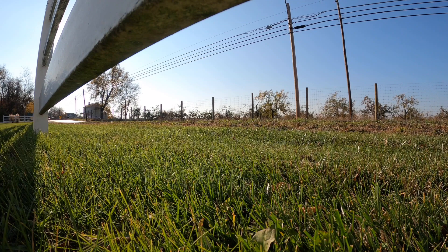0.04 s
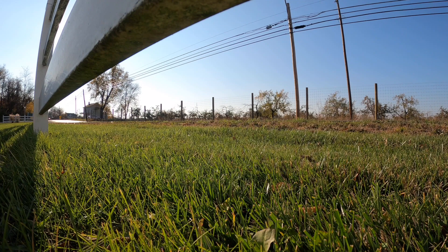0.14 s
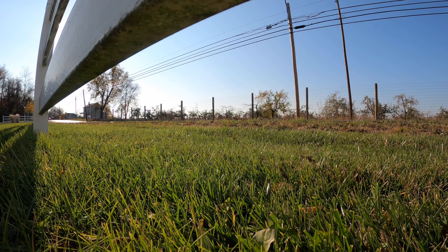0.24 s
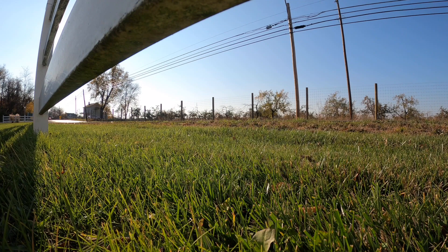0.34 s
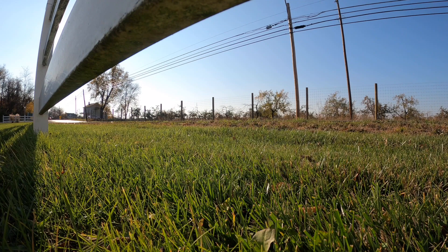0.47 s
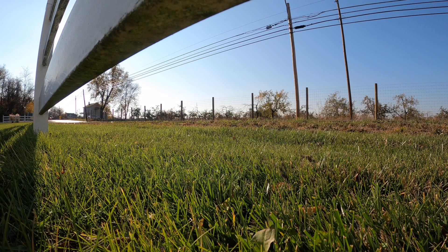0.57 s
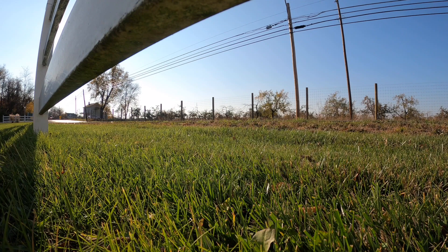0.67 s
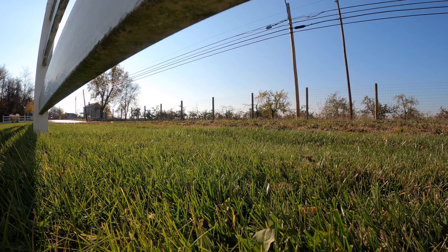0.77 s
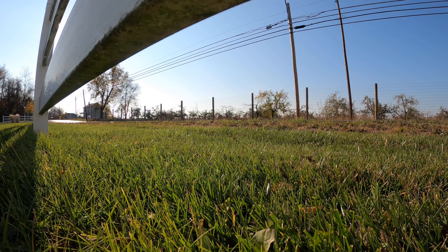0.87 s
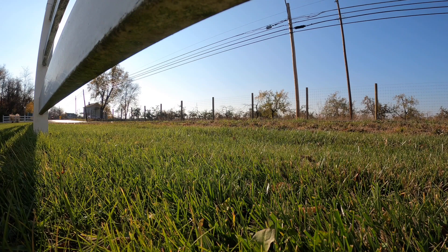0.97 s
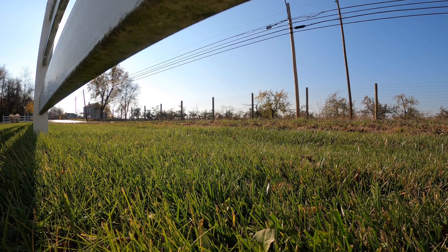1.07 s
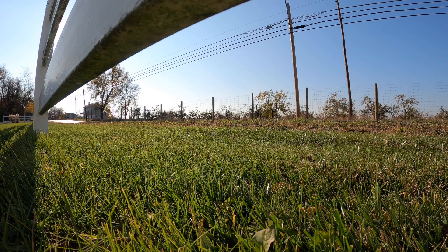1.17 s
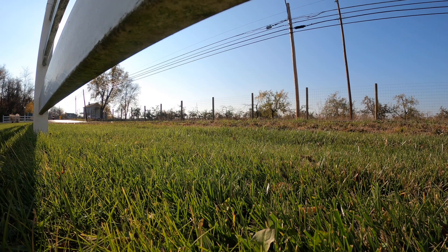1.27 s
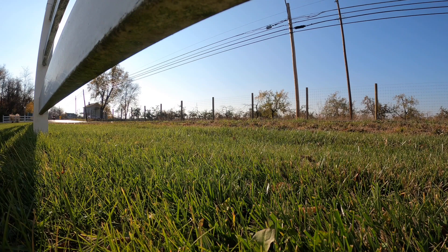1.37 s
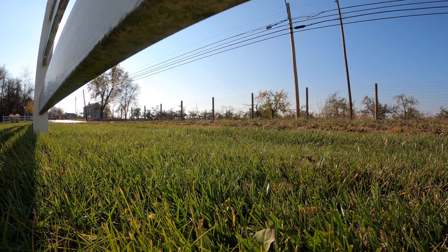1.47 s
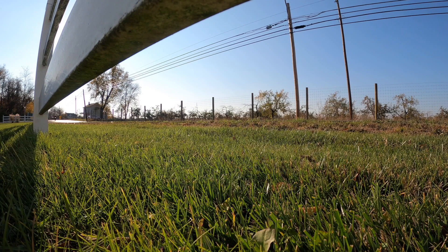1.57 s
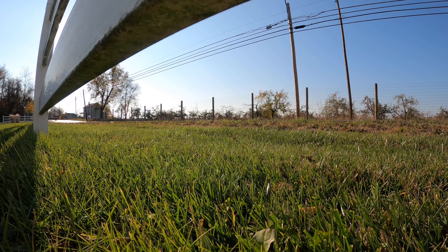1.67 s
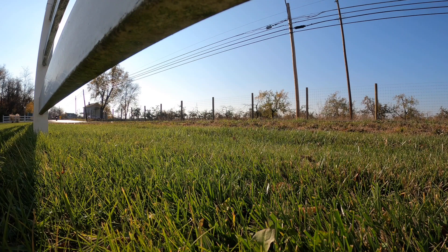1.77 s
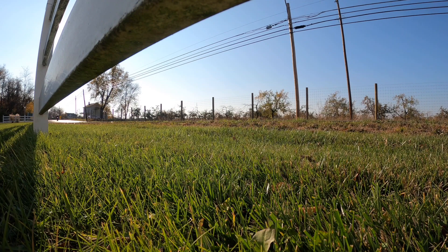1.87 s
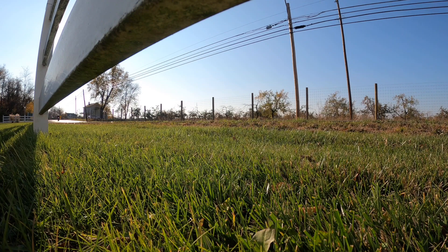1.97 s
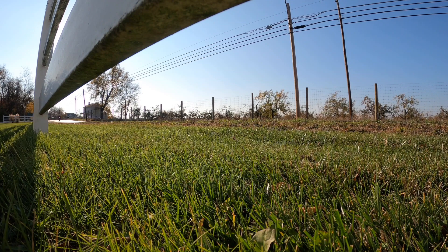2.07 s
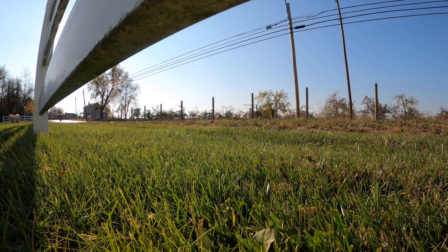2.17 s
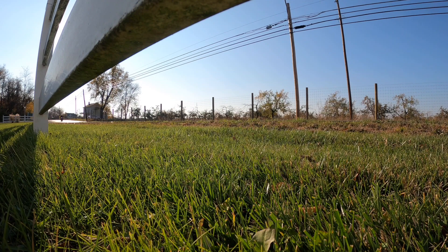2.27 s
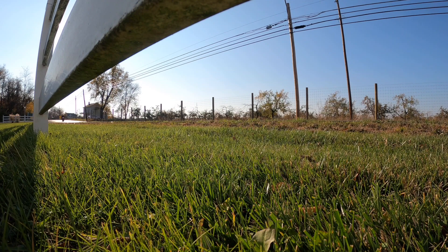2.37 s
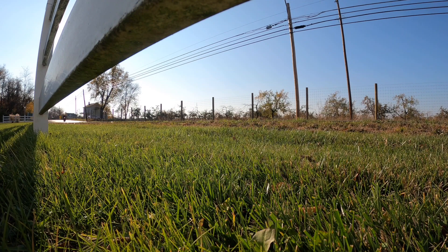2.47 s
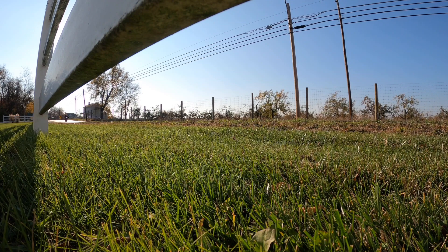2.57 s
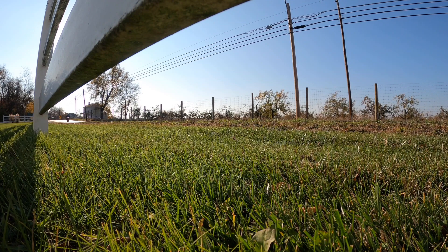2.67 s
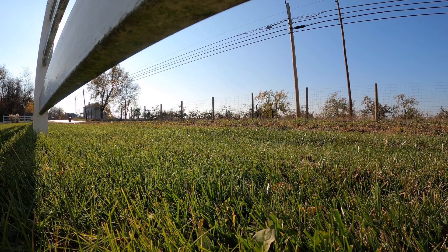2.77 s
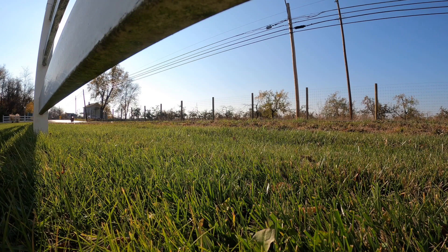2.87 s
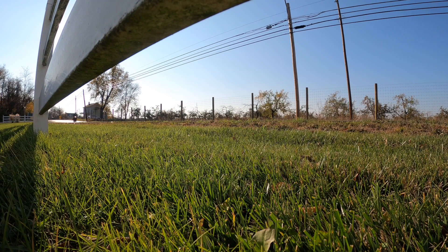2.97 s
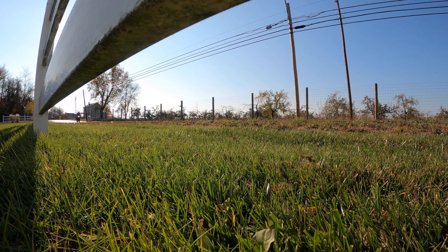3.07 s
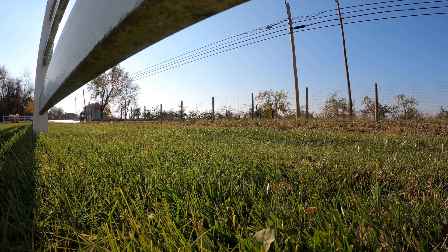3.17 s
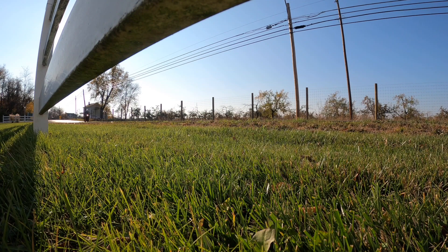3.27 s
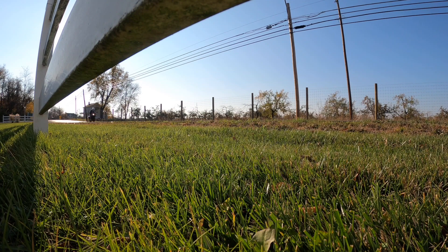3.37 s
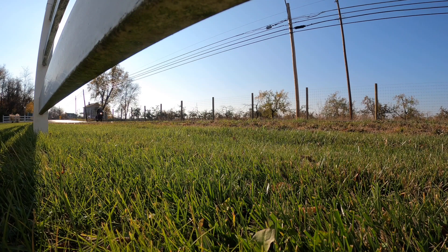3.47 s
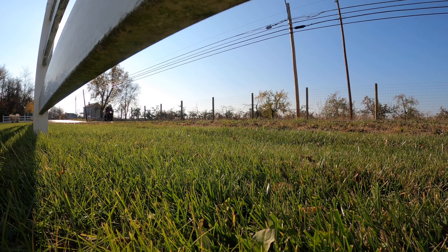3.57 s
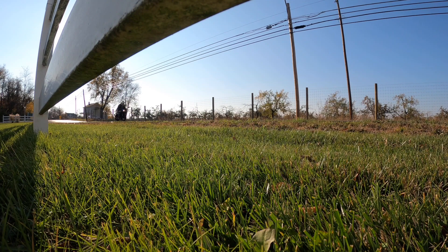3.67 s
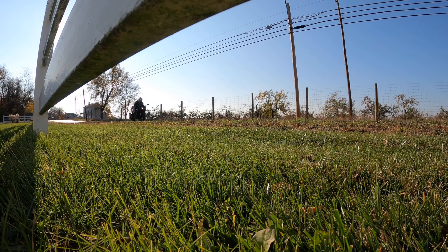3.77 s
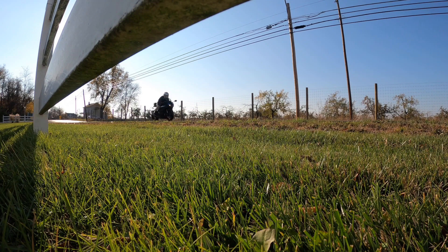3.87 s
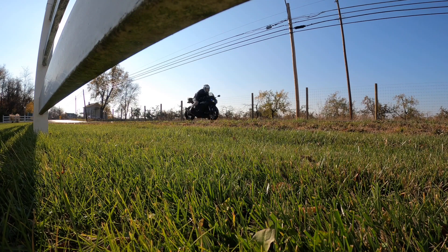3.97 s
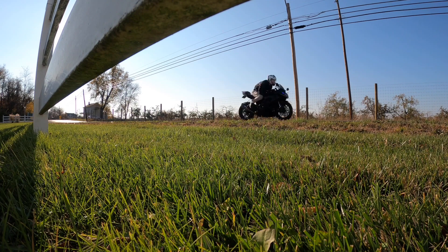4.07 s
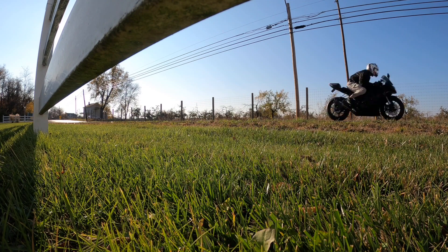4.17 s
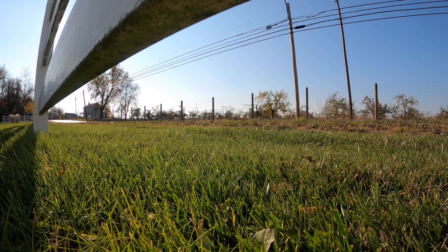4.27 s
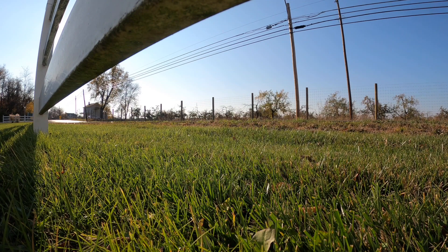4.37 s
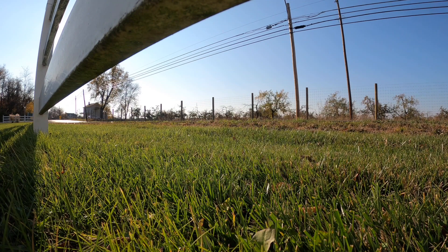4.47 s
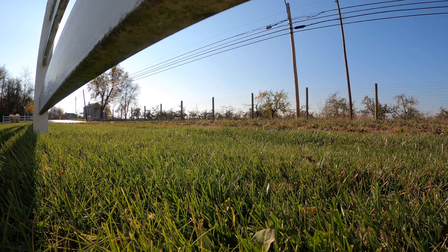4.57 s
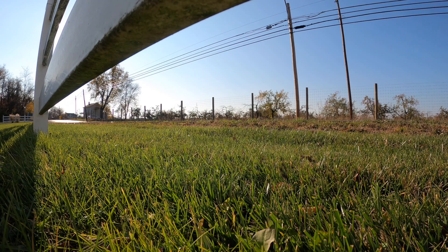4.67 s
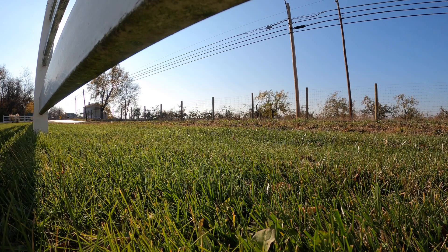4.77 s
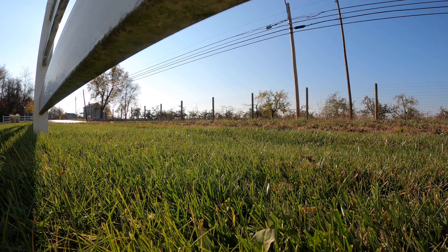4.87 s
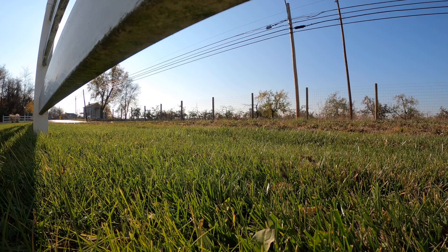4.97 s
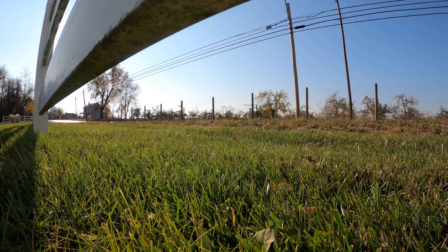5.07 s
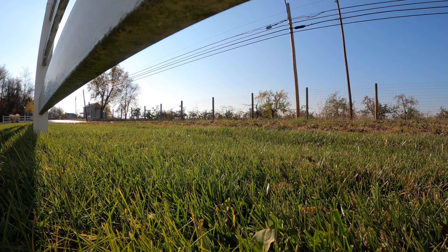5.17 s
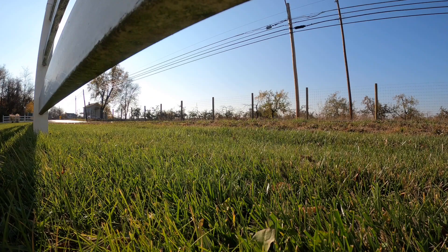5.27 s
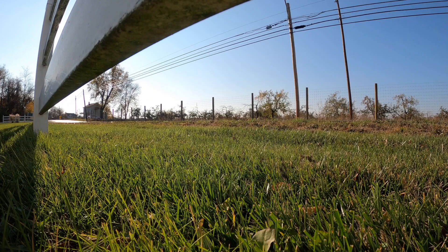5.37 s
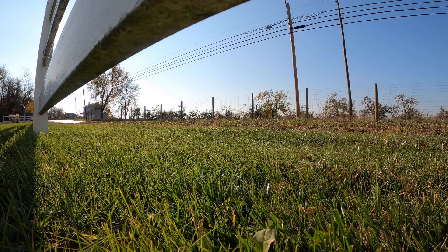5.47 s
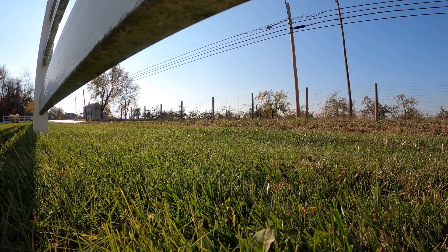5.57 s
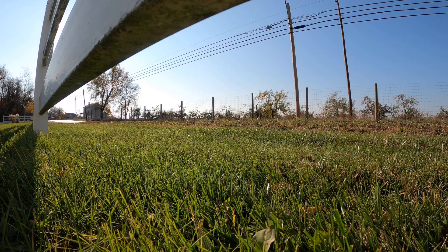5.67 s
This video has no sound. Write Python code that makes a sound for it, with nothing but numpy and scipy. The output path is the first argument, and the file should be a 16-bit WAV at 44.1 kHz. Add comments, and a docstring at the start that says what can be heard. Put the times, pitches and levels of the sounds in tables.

```python
"""Sport motorcycle passing on a country road

A four-cylinder bike accelerates past a microphone low in the grass, its firing note climbing and
stumbling through four quick upshifts. It comes in on a smooth intake hum, drops in pitch as it goes by
in a rush of chain, valve and tyre noise, and leaves on the rasp of turbulent exhaust gas.
Wind buffets the microphone over a faint bed of open country."""
import sys
import numpy as np
from scipy import signal
from scipy.fft import rfft, irfft
from scipy.io import wavfile
from scipy.ndimage import uniform_filter1d

SR = 44100
rng = np.random.default_rng(int(sys.argv[2]) if len(sys.argv) > 2 else 0)


def transcribe(signal):
    """Save signal, clipped to [-1, 1], as a 16-bit WAV file at the path in sys.argv[1]."""
    frames = np.atleast_2d(signal).T
    limited = np.clip(frames, -1, 1)
    pcm = np.round(limited * 32767).astype(np.int16)
    wavfile.write(sys.argv[1], SR, pcm)


N = 252693
TIME = np.arange(N) / SR
PASS_S, PASS_WIDTH_S, MACH = 4.22, .15, .083  # nearest moment, distance / speed, speed / speed of sound

# Pulling away in the low gear. Each row: time in seconds, firing rate in Hz.
LOW_GEAR = [(0, 170.1), (.3, 173), (1.05, 185.3), (1.5, 201.9), (2.15, 245.5), (2.35, 260.5)]
# Upshifts. Each row: start in seconds, new firing rate in Hz, its climb in Hz per second, flare in Hz,
# sag in Hz, stumble length in seconds, dip at the power cut in dB, dip as the gear bites in dB.
UPSHIFTS = [(2.352, 218.7, 47.3, 33.1, 10, 0.15, 7, -1), (3.243, 224.8, 35.6, 24.7, 8, .1, 2.5, 0.5),
            (4.042, 222.9, 16, 31, 0, 0.16, 16, 7.5), (5.268, 218.6, 12, 4.02, 2, .08, 11, 0.5)]
# Fader of the firing note, before the shift dips. Each row: time in seconds, level in dB.
NOTE_FADER = [(0, -33.5), (.22, -32), (.6, -32), (1.22, -24.5), (1.45, -26.3), (2.25, -17.6), (2.74, -19.5),
              (2.83, -13.2), (3.9, -10.9), (4.38, -10.3), (4.6, -13.3), (4.82, -17.8), (5.0, -18.5),
              (5.15, -21.5), (5.73, -23.3)]
# Fader shared by overtones and rasp. Each row: time in seconds, relative level in dB.
OVERTONE_FADER = [(0, -48.5), (.7, -45), (1.6, -41.5), (2.2, -44), (2.95, -37), (3.2, -40), (3.7, -35.5),
                  (4.03, -28), (4.15, -17), (4.25, -21.5), (4.6, -21), (4.9, -33), (5.25, -43.5),
                  (5.45, -40), (5.73, -42.5)]
# Engine overtones. Each row: multiple of the firing rate, then relative level in dB from far ahead,
# close ahead, close behind and far behind.
ENGINE_ORDERS = [(0.5, 1.5, -16, -16, -5), (0.75, -1.5, -2.5, -18.5, -9), (1.25, -3.5, -3.5, -8, 3),
                 (1.5, -1, -3, -5.5, -1), (1.75, -11, -19.5, -19, -24.5), (2, 1, -8, -3.5, -5),
                 (2.25, -23.5, -21.5, -16.5, -19), (2.5, -20.5, -18.5, -13, -15),
                 (2.75, -17.5, -35, -19.5, -23.5), (3, -15, -13.5, -12.5, -15),
                 (3.25, -31.5, -39, -25, -33.5), (3.5, -29.5, -26.5, -30.5, -24.5),
                 (3.75, -26, -20.5, -30, -24.5), (4, -27, -13.5, -45.5, -39), (4.5, -30, -17, -42, -41.5),
                 (5, -32, -19.5, -38.5, -29.5), (5.5, -34, -33, -49.5, -34.5), (6, -33.5, -21, -48, -26),
                 (7, -34, -26, -54.5, -38.5)]
# Perspective on the bike. Each row: time in seconds, view (0 far ahead, 1 close ahead, 2 close behind,
# 3 or more far behind).
PERSPECTIVE = [(0, 0), (3.0, 0.5), (4.06, 1.5), (4.19, 2), (4.8, 2), (5.2, 5.5)]
# Tone of the turbulent exhaust gas. Each row: frequency in Hz, relative level in dB.
RASP_TONE = [(120, -15), (230, 4.5), (330, 7), (480, 7.5), (680, -13), (880, -27), (1200, -46), (2000, -64)]
# Fader shared by the rush and the ringing metal. Each row: time in seconds, relative level in dB.
RUSH_FADER = [(0, -71), (1.04, -62), (1.56, -54), (2.7, -51.5), (2.82, -48), (3.75, -47.5), (4.05, -40),
              (4.14, -34.5), (4.38, -35.8), (4.75, -50), (5.15, -54), (5.35, -60), (5.73, -56.5)]
# Tone of the rush from ahead, beside and behind. Each row: frequency in Hz, relative level in dB.
RUSH_AHEAD = [(400, -10.5), (700, -6), (980, -6.5), (1450, -5.5), (1850, -5.5), (2250, -11.5),
              (2700, -11.5), (3400, -12.5), (4800, -13), (6000, -23.5), (7800, -33.5), (9000, -42),
              (14000, -63)]
RUSH_BESIDE = [(500, -19), (950, -18), (1350, -9), (2000, -3.5), (2500, -0.5), (3000, -4.5), (4500, -8),
               (5300, -4), (6000, -12), (7600, -12), (9000, -22.5), (11300, -27.5), (14800, -41.5)]
RUSH_BEHIND = [(500, -10.5), (800, -5), (1020, -12.5), (1400, -9), (1900, -11), (2500, -16), (3200, -12.5),
               (4300, -9.5), (5700, -17.5), (6900, -19), (9000, -30.5), (14000, -53)]
# Fader of the tyres singing on asphalt. Each row: time in seconds, level in dB.
TYRE_FADER = [(0, -56), (.2, -61), (.35, -80), (1.15, -72.5), (1.3, -53), (1.8, -58), (2.85, -47.5),
              (3.02, -56.5), (4.05, -63.5), (4.5, -81)]
# Tone of the tread. Each row: frequency in Hz, relative level in dB.
TYRE_TONE = [(400, -22), (700, 1.5), (950, -1.5), (1150, -7.5), (1500, -18.5), (3000, -50.5)]
# Ringing metal. Each row: pitch at rest in Hz, width in Hz, dB on the rush fader from afar and close by.
METAL_RINGS = [(1750, 76, -16, -17.5), (2488, 290, -14, -19), (3510, 140, -22.5, -8.5),
               (3920, 250, -19, -11), (4470, 240, -17.5, -5)]
# Whine of the last gear. Each row: multiple of the firing rate, level in dB.
GEAR_WHINE = [(6.5, -69.5), (16.25, -69), (24.45, -70)]
# Fader of the breeze. Each row: time in seconds, relative level in dB.
WIND_FADER = [(0, -31.5), (.55, -32), (.8, -25.5), (1.1, -24.5), (1.62, -31), (1.95, -26), (2.6, -35.5),
              (2.92, -36), (3.18, -27), (3.6, -31), (4.3, -35), (5.0, -33), (5.25, -37.5), (5.73, -37.5)]
# Tone of the wind rumble. Each row: frequency in Hz, relative level in dB.
WIND_TONE = [(15, -3), (30, 2.5), (65, 6), (110, -1), (170, -0.5), (260, -14.5), (400, -25), (700, -46),
             (1500, -64.5), (4000, -82)]
# Single buffets. Each row: crest time in seconds, rms at the crest in dB, width in seconds, top in Hz.
BUFFETS = [(.2, -26, 0.016, 110), (.63, -26.5, 0.012, 225), (.76, -27, 0.025, 214), (.86, -34, 0.017, 330),
           (0.929, -24.5, 0.021, 300), (1.005, -35, 0.0098, 323), (1.095, -29, 0.0094, 320),
           (1.196, -28.5, 0.0074, 600), (1.243, -31, 0.0071, 447), (1.475, -38, 0.011, 383),
           (2.06, -23, 0.018, 282), (2.807, -20, 0.013, 170), (2.814, -20.5, 0.01, 406),
           (3.15, -26.5, 0.022, 130.9)]
# Wind slaps on the membrane. Each row: time in seconds, level in dB.
SLAPS = [(.861, -44), (1.005, -39), (1.091, -41), (1.193, -30), (1.243, -36), (2.816, -21)]
# Tone of the open country. Each row: frequency in Hz, relative level in dB.
COUNTRY_TONE = [(200, -1.5), (650, -1.5), (1000, -10.5), (1500, -15), (1850, -6), (2150, -19),
                (3100, -17.5), (3550, -9.5), (4200, -23.5), (5500, -31), (8000, -46), (12000, -72)]


def firing_rate(fall_s=.036):
    """The revs climb in each gear; at a shift they fall, flare before the clutch grips, then sag."""
    hz = automation(LOW_GEAR)
    for start, new_hz, climb, flare_hz, sag_hz, *_ in UPSHIFTS:
        engaged = np.clip((TIME - start) / fall_s, 0, 1)
        hz = (1 - engaged) * hz + engaged * (new_hz + climb * (TIME - start))
        hz = hz + flare_hz * bell(start + .068, width_s=.02) - sag_hz * bell(start + .125, width_s=.025)
    return hz


def shift_dips():
    """Decibels the note ducks as the power is cut, and again as the new gear bites."""
    dip_db = 0
    for start, *_, cut_db, bite_db in UPSHIFTS:
        power_cut = np.interp(TIME - start, [-.0094, .0054, .043], [0, 1, 0])
        dip_db = dip_db + cut_db * power_cut + bite_db * bell(start + .11, width_s=.028)
    return dip_db


def stumbling():
    """A soft gate: 1 in the middle of a shift, 0 under steady power."""
    return sum(np.exp(-(2 * (TIME - start) / length - 1) ** 4) for start, *_, length, _, _ in UPSHIFTS)


def unevenness(stumble, coming=.074):
    """Depth of the engine's flutter: least just past the microphone, more with distance and in shifts."""
    leaving = .01 + .11 * np.maximum(TIME - PASS_S, 0)
    return crossfade([coming, leaving], (TIME - PASS_S) / PASS_WIDTH_S + .5) + .12 * stumble


def firing_note(firings, uneven, flutter_hz=50):
    """The almost pure boom at the firing rate; unequal burns shake its strength and timing."""
    level_db = automation(NOTE_FADER) - shift_dips()
    phase = 2 * np.pi * firings + uneven * drift(flutter_hz)
    return np.sqrt(2) * from_db(level_db) * (1 + uneven * drift(flutter_hz)) * np.sin(phase)


def overtones(firings, uneven, view, stumble, trim_db=-3):
    """The four cylinders differ, so partials sit on quarters of the firing rate; each fades on its own."""
    out, jitter = 0, uneven * drift(35)
    far_ahead = 1 - np.clip(view, 0, 1)
    for order, *views_db in ENGINE_ORDERS:
        phase = 2 * np.pi * (order * firings + rng.random())
        phase = phase + order * (jitter + .05 * far_ahead * drift(25))
        dulled_db = -12 * stumble * np.clip(order - 2, 0, 1)  # without power the pulses lose their edge
        fading_db = (2.5 + far_ahead) * drift(14)
        out = out + from_db(crossfade(views_db, view) + dulled_db + fading_db) * np.sin(phase)
    return np.sqrt(2) * from_db(automation(OVERTONE_FADER) + trim_db) * out


def exhaust_rasp(firings, uneven, view, views_db=(-14, -14, -14.5, -8)):
    """Each puff of gas carries turbulence, more when the firing stumbles and as the pipe goes by."""
    puffs = 1 + .46 * np.cos(2 * np.pi * firings)
    beside_db = 4 / (1 + ((TIME - PASS_S) / PASS_WIDTH_S) ** 2)
    level_db = automation(OVERTONE_FADER) + crossfade(views_db, view) + beside_db
    burble = .39 + 2.4 * uneven
    return from_db(level_db) * burble * unit_rms(puffs * shaped_noise(RASP_TONE))


def valve_clatter(firings, harmonics=200, size=4096):
    """Valves and cams tick out a random loop that repeats every four firings."""
    loop = irfft(np.r_[0, np.exp(2j * np.pi * rng.random(harmonics))], size)
    return unit_rms(np.interp(firings / 4 % 1, np.arange(size) / size, loop))


def rush(firings, frame=512):
    """Chain, valve and tyre noise, pulsing with the engine and heard through a moving EQ."""
    noise = rng.standard_normal(N) + .39 * valve_clatter(firings + .0098 * drift(25))
    pulsing = 1 + .26 * np.cos(2 * np.pi * firings)
    flicker = from_db(.22 * drift(40))
    hz, times, frames = signal.stft(unit_rms(noise * pulsing * flicker), SR, nperseg=frame)
    frames = frames * rush_eq(hz[:, None], times) * shimmer(frames.shape)
    return signal.istft(frames, SR, nperseg=frame)[1][:N]


def rush_eq(hz, times, trim_db=-2.5, shelf_hz=6200):
    """The rush changes tone from ahead to beside to behind; air and grass dull it with distance."""
    beside_db = tone_db(RUSH_BESIDE, hz / doppler(times))
    side = np.interp(times, [3.75, 4.15, 4.6], [0, 1, 2])
    gain = from_db(crossfade([tone_db(RUSH_AHEAD, hz), beside_db, tone_db(RUSH_BEHIND, hz)], side))
    body_power = np.sum(gain ** 2 * ((hz > 1100) & (hz < 6000)), axis=0)
    treble_power = np.sum(gain ** 2 * ((hz > 6500) & (hz < 13000)), axis=0)
    # The shelf steers the treble-to-body balance: brightest 0.1 s after the pass.
    distance_doublings = np.log2(np.hypot(1, (times - PASS_S - .1) / PASS_WIDTH_S))
    shelf_db = -8.1 - 2.95 * distance_doublings - 10 * np.log10(treble_power / body_power)
    shelf = np.clip(.5 + 1.3 * np.log2((hz + 1) / shelf_hz), 0, 1)
    level_db = automation(RUSH_FADER, times) + trim_db + shelf * shelf_db
    return gain * from_db(level_db) * np.sqrt(len(hz) / body_power)


def shimmer(shape, depth_db=1.4, patch_cells=5):
    """Small patches of the spectrum swell and fade at random."""
    field = rng.standard_normal(shape)
    for axis in (0, 1):
        field = uniform_filter1d(field, patch_cells, axis=axis)
    return from_db(depth_db * unit_rms(field))


def tyres():
    """A hollow band of tread noise, thrown forward along the road in swells as the bike comes."""
    return from_db(automation(TYRE_FADER)) * shaped_noise(TYRE_TONE)


def ringing_metal():
    """Chain and valve train ring metal in narrow bands that slide down and brighten in the pass."""
    out, bike_time = 0, np.cumsum(doppler(TIME)) / SR
    close = np.interp(TIME, [3.75, 4.25, 4.47, 4.9], [0, 1, 1, 0])
    for hz, width_hz, *levels_db in METAL_RINGS:
        phase = 2 * np.pi * hz * bike_time
        ring = drift(width_hz) * np.cos(phase) + drift(width_hz) * np.sin(phase)
        fading_db = 2.5 * drift(25)
        out = out + from_db(crossfade(levels_db, close) + fading_db) * ring
    return from_db(automation(RUSH_FADER)) * out


def gearbox(firings, clunk_s=4.07, clunk_hz=990):
    """The box rings as a gear goes in close by; a thin, wavering whine follows the last shift."""
    clunk = from_db(-40) * np.exp(-.5 * ((TIME - clunk_s) / .014) ** 2)
    clunk = clunk * np.sin(2 * np.pi * clunk_hz * TIME)
    whine = sum(from_db(db + 4 * drift(10)) * np.sin(2 * np.pi * order * firings + .7 * drift(30))
                for order, db in GEAR_WHINE)
    return clunk + np.interp(TIME, [5.33, 5.5], [0, 1]) * whine


def wind(trim_db=-1, lumps_db=2):
    """Eddies rumble on the microphone, with short buffets that reach higher."""
    out = from_db(automation(WIND_FADER) + trim_db + lumps_db * drift(22)) * shaped_noise(WIND_TONE)
    for crest_s, crest_db, width_s, top_hz in BUFFETS:
        band = signal.butter(2, [60, top_hz], "band", fs=SR, output="sos")
        eddy = unit_rms(signal.sosfilt(band, signal.sosfilt(band, rng.standard_normal(N))))
        out = out + from_db(crest_db) * np.exp(-.5 * ((TIME - crest_s) / width_s) ** 2) * eddy
    return out


def wind_slaps(width_s=.00056):
    """Some buffets slap the microphone's membrane with a quick swing of pressure."""
    out = 0
    for slap_s, level_db in SLAPS:
        offset = np.clip((TIME - slap_s) / width_s, -10, 10)
        out = out + from_db(level_db) * 2 * offset * np.exp(-offset ** 2)
    return out


def crackle(middle_s=2.5, fade_s=.018):
    """A brief, faint crackle sounds on its own between the gusts."""
    envelope = np.exp(-np.minimum(abs(TIME - middle_s) / fade_s, 20))
    grains = rng.standard_normal(N) ** 3 * envelope
    return from_db(-57) * signal.lfilter([.1], [1, -.7], grains)  # low-pass softens the grains


def countryside(level_db=-61):
    """A faint, steady bed of open air."""
    return from_db(level_db) * shaped_noise(COUNTRY_TONE)


def doppler(times, middle_s=PASS_S, width_s=PASS_WIDTH_S):
    """Pitch factor: above 1 while the bike comes, below 1 as it goes."""
    return 1 - MACH * (times - middle_s) / np.hypot(times - middle_s, width_s)


def from_db(db):
    """Decibels to gain."""
    return 10 ** (np.asarray(db) / 20)


def unit_rms(x):
    """Scale to rms 1."""
    return x / np.sqrt(np.mean(x ** 2) + 1e-20)


def automation(points, times=TIME):
    """Breakpoints in time, joined by straight lines."""
    return np.interp(times, *np.transpose(points))


def tone_db(points, hz):
    """An EQ curve in dB, read on a log-frequency axis."""
    knots_hz, levels_db = np.transpose(points)
    return np.interp(np.log(hz + 1), np.log(knots_hz), levels_db)


def shaped_noise(tone):
    """White noise through an EQ curve, rms 1."""
    gain = from_db(tone_db(tone, np.fft.rfftfreq(N, 1 / SR)))
    return unit_rms(irfft(rfft(rng.standard_normal(N)) * gain, N))


def drift(rate_hz, size=16384):
    """Random modulation up to a given rate, rms about 1."""
    hz = np.fft.rfftfreq(size, N / SR / size)
    slow = irfft(rfft(rng.standard_normal(size)) / (1 + (hz / rate_hz) ** 4))
    return np.interp(np.arange(N) * size / N, np.arange(size), unit_rms(slow))


def crossfade(choices, position):
    """Fade along a row of choices: position 0 is the first, 1 the second, and so on."""
    position = np.clip(position, 0, len(choices) - 1)
    return sum(choice * np.clip(1 - abs(position - k), 0, 1) for k, choice in enumerate(choices))


def bell(middle_s, width_s):
    """A swell of height 1 around a moment."""
    return np.exp(-np.square((TIME - middle_s) / width_s))


def scene():
    """One running count of firings drives engine, rush and gear whine; wind and country lie beneath."""
    # The engine's pitch slides down a little later and more slowly than the ringing metal's.
    firings = np.cumsum(firing_rate() * doppler(TIME, middle_s=4.33, width_s=.19)) / SR
    stumble, view = stumbling(), automation(PERSPECTIVE)
    uneven = unevenness(stumble)
    engine = firing_note(firings, uneven) + overtones(firings, uneven, view, stumble)
    engine = engine + exhaust_rasp(firings, uneven, view)
    shift_lift = from_db(.5 * stumble)
    machinery = shift_lift * rush(firings) + tyres() + ringing_metal() + gearbox(firings)
    return (engine + machinery + wind() + wind_slaps() + crackle() + countryside())[None]


def record(dry, cutoff_hz=15000):
    """A steep high cut takes off the very top."""
    return signal.sosfilt(signal.cheby2(12, 70, cutoff_hz, fs=SR, output="sos"), dry)


dry = scene()
out = record(dry)
transcribe(out)
```